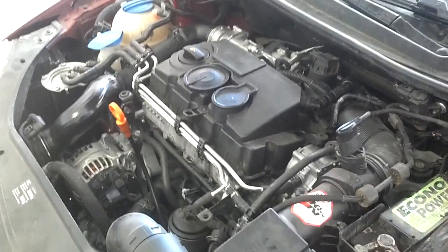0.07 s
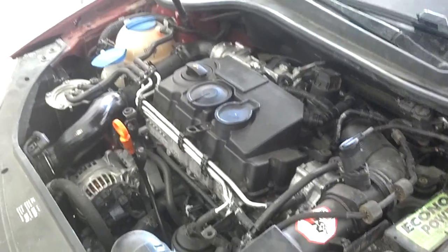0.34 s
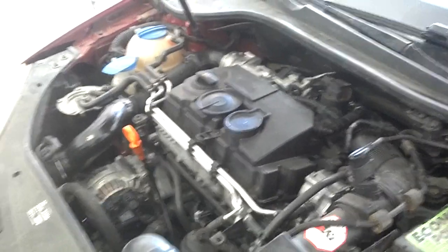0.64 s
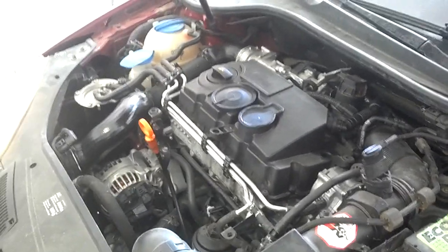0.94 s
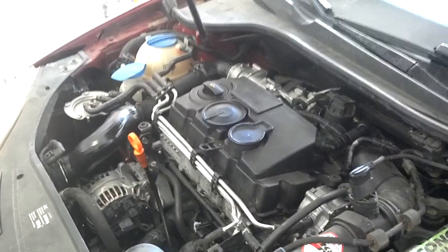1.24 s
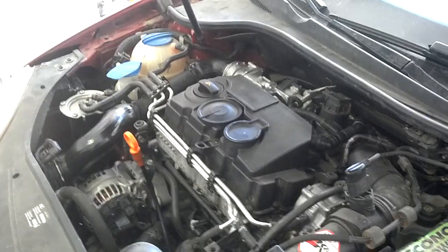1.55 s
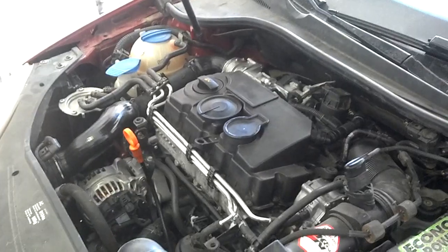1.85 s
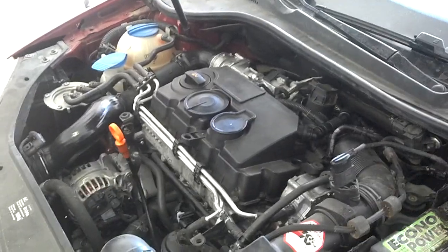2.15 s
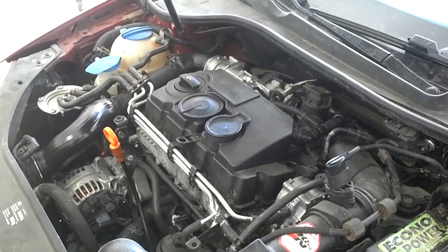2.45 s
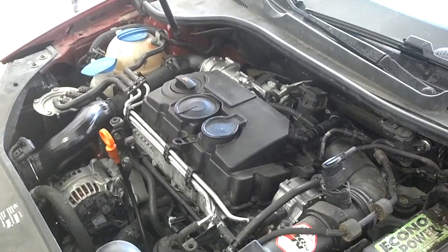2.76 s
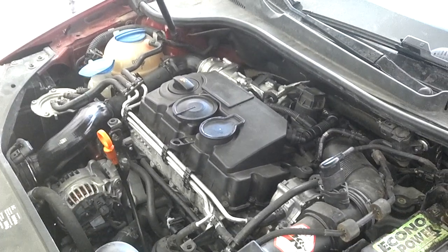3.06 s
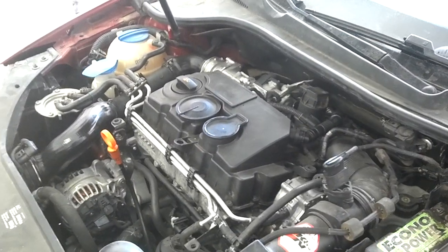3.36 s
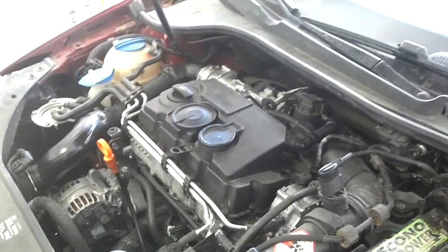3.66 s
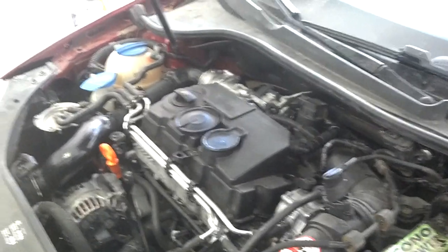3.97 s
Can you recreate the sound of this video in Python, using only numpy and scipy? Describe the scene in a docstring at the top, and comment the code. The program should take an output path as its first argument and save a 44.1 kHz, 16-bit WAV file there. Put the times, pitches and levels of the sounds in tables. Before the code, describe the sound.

A diesel car engine idles close up with a rapid, regular metallic clatter.

```python
"""A four-cylinder diesel idles in an open engine bay, heard from close by.
Each firing is a knock that rings the block and an injector tick; the casing thuds, a valve taps,
and once a cycle something loose rattles, over the whirr of belts and gears.
Two close microphone ports, widened by cross-subtraction, pick it up."""
import sys
import numpy as np
from scipy import signal
from scipy.fft import rfft, irfft
from scipy.io import wavfile

SR = 44100
rng = np.random.default_rng(int(sys.argv[2]) if len(sys.argv) > 2 else 0)


def inscribe(sig):
    """Save sig as 16-bit PCM at rate SR to the path in sys.argv[1].

    A 1-D sig is mono; a 2-D sig holds one channel per row.
    Samples are clipped to [-1, 1] before scaling.
    """
    pcm = np.round(np.clip(np.atleast_2d(sig).T, -1, 1) * 32767)
    wavfile.write(sys.argv[1], SR, pcm.astype(np.int16))


N = 176400
TIME_S = np.arange(N) / SR
NEAR_ONLY = np.array([[1], [0]])
DETUNE, BLOW_SCATTER_DB = 0.0082, 0.96
TICK_RISE_S, TICK_HOLD_S, TICK_REPEAT = 0.0012, 0.0017, 0.54


def undb(db):
    """Decibels to gain."""
    return 10 ** (np.asarray(db) / 20)


def curve(points):
    """Straight lines through (s, value) points."""
    return np.interp(TIME_S, *np.array(points, float).T)


def response(points):
    """Gain at every frequency from (Hz, dB) points."""
    hz, db = np.array(points, float).T
    return undb(np.interp(np.log(np.fft.rfftfreq(N, 1 / SR) + 1), np.log(hz), db))


def colour(x, points):
    """Shape a sound by a spectrum."""
    return irfft(rfft(x) * response(points), N)


def crank_times(crank, degrees):
    """Times in seconds at which the 720-degree cycle passes a crank angle."""
    passes = np.arange(int(crank[-1]) + 1) + degrees / 720
    return np.interp(passes, crank, TIME_S, right=2 * N / SR)


def cyclic_noise(crank, repeat):
    """Noise at two ports; the share `repeat` of its power recurs every cycle."""
    size = int(N / crank[-1]) // 2 * 2
    loop = irfft(np.exp(2j * np.pi * rng.random((2, size // 2 + 1)))) * np.sqrt(size)
    locked = loop[:, (crank % 1 * size).astype(int)]
    return np.sqrt(repeat) * locked + np.sqrt(1 - repeat) * rng.standard_normal((2, N))


def blows(crank, degrees, db, rise_s, decay_s, hold_s=0):
    """Envelope of one blow a cycle: quick rise, hold, exponential decay, uneven strength."""
    times = crank_times(crank, degrees)
    current = np.searchsorted(times[1:] - 0.01, TIME_S)  # 10 ms lead for the rise
    age_s = TIME_S - times[current]
    strength = undb(db + BLOW_SCATTER_DB * rng.standard_normal(len(times)))
    return strength[current] * np.exp(np.minimum(age_s, 0) / rise_s - np.maximum(age_s - hold_s, 0) / decay_s)


def add_mode(out, start_s, hz, db, swell_s, phases):
    """Add a resonance that swells and dies away; one phase in turns per port."""
    first = int(max(start_s, 0) * SR)
    t = np.arange(first, min(first + int(10 * swell_s * SR), N)) / SR - start_s
    age = np.maximum(t, 0) / swell_s
    envelope = undb(db) * (age * np.exp(1 - age)) ** 2
    out[:, first:first + len(t)] += envelope * np.sin(2 * np.pi * (hz * t + phases[:, None]))


def ringing_parts(crank, table, scatter_db):
    """Parts ring once a cycle, each at its own crank angle, at the near port."""
    out = np.zeros((1, N))
    for degrees, hz, db, swell_s in table:
        phase = rng.random(1)
        for start_s in crank_times(crank, degrees):
            force, detune = rng.standard_normal(2)
            add_mode(out, start_s, hz * (1 + DETUNE * detune), db + scatter_db * force, swell_s, phase)
    return out * NEAR_ONLY


# Each row: centre in seconds, level in dB, half length in seconds.
MURMURS = [(0.256, -3.5, 0.023), (0.315, -3, 0.059), (1.43, -4.5, 0.033), (2.84, -4.5, 0.024)]
# Each row: frequency in Hz, level in dB.
MURMUR_SPECTRUM = [(150, -22), (260, -15.5), (335, -3), (400, -23.5), (470, -5), (650, -16.5),
                   (1200, -15.5), (3000, -73)]


def murmurs():
    """Brief swells of hollow, low noise."""
    envelope = sum(undb(db) * np.exp(-((TIME_S - at_s) / half_s) ** 2) for at_s, db, half_s in MURMURS)
    return colour(envelope * rng.standard_normal((2, N)), MURMUR_SPECTRUM)


# Each row of both: frequency in Hz, level in dB.
WHIRR_LOW_SPECTRUM = [(20, -48), (45, -28), (75, -22), (100, -56), (135, -21), (190, -21), (220, -20),
                      (280, -19.5), (370, -20.5), (450, -20), (570, -18.5), (750, -21), (1000, -26.5),
                      (2000, -68)]
WHIRR_HIGH_SPECTRUM = [(500, -40.5), (900, -25), (1050, -19.5), (1220, -17), (1400, -20), (1650, -26),
                       (2050, -21.5), (2650, -27), (3000, -25), (3450, -29.5), (4000, -35), (5500, -36.5),
                       (7100, -38), (9000, -42.5), (12000, -50.5), (15000, -45)]


def whirr(crank, low_db, high_db, flutter_db=2.5, flutter_per_s=250):
    """Belts and gears run on between firings, with a fine flutter in the treble."""
    count = int(flutter_per_s * N / SR)
    wander = np.interp(np.linspace(0, count - 1, N), np.arange(count), rng.standard_normal(N)[:count])
    low = colour(cyclic_noise(crank, repeat=0.47), WHIRR_LOW_SPECTRUM)
    high = colour(undb(flutter_db * wander) * cyclic_noise(crank, repeat=0.39), WHIRR_HIGH_SPECTRUM)
    return low * undb(low_db) + high * undb(high_db)


# Each row: crank angle in degrees, level in dB, decay in seconds.
RATTLE_BLOWS = [(453, -6.5, 0.014), (556, -9, 0.015)]
# Each row: frequency in Hz, level in dB.
RATTLE_SPECTRUM = [(200, -55), (350, -26), (440, -3), (560, -20), (680, -7), (800, -12.5), (1000, -31),
                   (2000, -31)]
# Each row: multiple of the firing rate, level in dB.
HUM_HARMONICS = [(1, -78), (2, -49.5), (3, -59), (5, -44), (9, -48), (10, -45)]
# Each row: crank angle in degrees, frequency in Hz, level in dB, swell in seconds.
CASING_THUDS = [(0, 428, -33.5, 0.0068), (46.1, 296.4, -26.5, .0074), (141.5, 265, -33, 0.01),
                (230.4, 315, -27.5, 0.0056), (408.7, 233, -29, 0.0047), (411, 340, -30, 0.005),
                (428, 578, -26, 0.0037), (431.5, 150.6, -26, 0.0082), (447, 735, -26, 0.003),
                (478, 457, -26.5, 0.006), (491.4, 277.6, -32.5, 0.0068), (563, 751, -23.5, 0.0034),
                (596, 430, -30.5, .0055), (609.6, 145, -36, 0.0089), (630, 597, -29.5, 0.0033)]


def casing(crank, rattle_rise_s=0.0025):
    """The shaking engine hums, its casing thuds and a loose part rattles."""
    shake = sum(blows(crank, degrees, db, rattle_rise_s, decay_s) for degrees, db, decay_s in RATTLE_BLOWS)
    firings = 4 * crank
    hum = sum(undb(db) * np.sin(2 * np.pi * (k * firings + rng.random())) for k, db in HUM_HARMONICS)
    thuds = ringing_parts(crank, CASING_THUDS, scatter_db=1)
    rattle = colour(shake * cyclic_noise(crank, repeat=0.49), RATTLE_SPECTRUM)
    return thuds + hum * NEAR_ONLY + rattle


# Each row: crank angle in degrees, frequency in Hz, level in dB, swell in seconds.
METAL_PINGS = [(2.97, 1830, -23.5, 0.00064), (3, 3580, -27.5, .0009), (14.11, 3396, -23.5, 0.0022),
               (176.8, 7235, -33, 0.0024), (320.4, 3100, -34, .0018), (326, 4600, -35, 0.0016),
               (362, 3488, -27, 0.0034), (545.5, 3640, -26, 0.0016), (543.5, 1450, -24, 0.0011)]


def pings(crank):
    """Injectors and valve ring with short metallic pings."""
    return ringing_parts(crank, METAL_PINGS, BLOW_SCATTER_DB)


# Each row of all three: frequency in Hz, level in dB.
TICK_SPECTRUM = [(700, -39), (1500, -25), (2100, -22), (2650, -15), (3000, -22.5), (3450, -17.5),
                 (4000, -26.5), (4800, -27), (5500, -25.5), (6500, -26.5), (7100, -25), (8000, -29),
                 (9000, -33), (9800, -29.5), (11500, -37.5), (14500, -32.5)]
VALVE_SPECTRUM = [(1000, -58), (2200, -15), (2650, -20), (3200, -16), (3900, -30), (4700, -17), (5500, -28),
                  (9000, -28.5), (12000, -40), (15000, -30)]
SNAP_SPECTRUM = [(3000, -51), (6500, -19), (7200, -7.5), (7700, -11.5), (9000, -51), (15000, -50)]
# Each row: crank angle in degrees, level in dB.
INJECTOR_SNAPS = [(9, -5.5), (184, -1), (547, -12)]
# Each row: a cylinder's tick angle in degrees, tick level in dB, tick decay in seconds,
# knock angle in degrees, base knock swell in seconds.
CYLINDER_FIRINGS = [(5, -0.5, 0.0071, 9.5, .002), (181.4, 1, 0.0058, 184, 0.0039),
                    (365.5, -1.5, 0.0076, 364, 0.0038), (547, 0, 0.0056, 561, 0.0047)]


def injectors_and_valve(crank, tick_db=1.66):
    """Four injectors tick, three snap hard on closing; one valve taps in between."""
    ticks = sum(blows(crank, degrees, tick_db + db, TICK_RISE_S, decay_s, TICK_HOLD_S)
                for degrees, db, decay_s, _, _ in CYLINDER_FIRINGS)
    snaps = sum(blows(crank, degrees, db, TICK_RISE_S / 2, decay_s=0.0023) for degrees, db in INJECTOR_SNAPS)
    taps = blows(crank, degrees=330, db=-1.5, rise_s=TICK_RISE_S, decay_s=0.013, hold_s=TICK_HOLD_S)
    layers = [(ticks, TICK_SPECTRUM), (snaps, SNAP_SPECTRUM), (taps, VALVE_SPECTRUM)]
    return sum(colour(envelope * cyclic_noise(crank, TICK_REPEAT), tone) for envelope, tone in layers)


# Each row: frequency in Hz, factor on the swell time, level in dB for each of cylinders 1 to 4.
BLOCK_MODES = [(812, 1.7, -38, -43, -33, -32.5), (1066.6, 0.87, -23.5, -14.5, -40, -40),
               (1184, 1.3, -34, -51, -31, -52), (1262, 0.88, -17, -47, -51, -52),
               (1351, 0.87, -46, -40, -51, -23.5), (1471, 0.78, -22, -34, -24.5, -26.5),
               (1741, 1.2, -20, -29, -36, -39), (1953, 0.92, -35, -40, -31.5, -33),
               (2091, 1.17, -17.5, -25, -27, -33.5), (3023, 1.58, -26, -24, -35, -31.5)]
KNOCK_DB, KNOCK_FAR_DB = -2, -17.5
KNOCK_SCATTER_DB, MODE_SCATTER_DB, KNOCK_JITTER_S = 0.77, 1.06, 0.00013


def knocks(crank):
    """Each combustion rings the block; every cylinder favours its own modes."""
    out = np.zeros((2, N))
    for cylinder, (_, _, _, degrees, swell_s) in enumerate(CYLINDER_FIRINGS):
        mode_phases = rng.random((len(BLOCK_MODES), 2))
        for due_s in crank_times(crank, degrees):
            late, force = rng.standard_normal(2)
            start_s = due_s + KNOCK_JITTER_S * late
            for (hz, stretch, *levels_db), phases in zip(BLOCK_MODES, mode_phases):
                detune, scatter = rng.standard_normal(2)
                db = KNOCK_DB + levels_db[cylinder] + KNOCK_SCATTER_DB * force + MODE_SCATTER_DB * scatter
                add_mode(out, start_s, hz * (1 + DETUNE * detune), db, swell_s * stretch, phases)
    return out * undb([[0], [KNOCK_FAR_DB]])


# Each row: time in seconds, engine speed in rpm.
SPEED_RPM = [(0.0, 791.08), (0.2, 789.27), (0.42, 819.67), (0.8, 819.86), (1.1, 823.79), (1.8, 828.0),
             (2.6, 826.35), (3.3, 829.24), (4.0, 831.28)]
# Each row of both: time in seconds, level in dB.
FIRING_DB = [(0, -25.5), (.08, -3.5), (.17, -5), (.32, -2), (.48, -1), (.85, 0.5), (1.3, -0.5),
             (2.1, -0.25), (3.4, -0.7), (4, -1)]
BODY_DB = [(0, 0), (.2, -5), (.45, 0), (2, -0.5), (4, -.5)]


def scene():
    """The engine's parts follow the crankshaft, over a few murmurs."""
    crank = np.cumsum(curve(SPEED_RPM)) / (120 * SR)  # cycles of two turns
    firing_db, body_db = curve(FIRING_DB), curve(BODY_DB)
    firings = (knocks(crank) + injectors_and_valve(crank) + pings(crank)) * undb(firing_db)
    body = casing(crank) * undb(body_db)
    return firings + body + whirr(crank, low_db=body_db, high_db=0.13 * firing_db) + murmurs()


# Each row of both: frequency in Hz, gain in dB.
FAR_PORT_EQ = [(200, -4), (1000, -6), (7500, -7), (9500, -1)]
MID_BASS_LIFT = [(30, 22), (60, 11.5), (125, 14.5), (250, 19.5), (500, 9), (1000, 4), (1500, -0.5),
                 (2000, -0.5)]
PORT_LAG_S, LOWPASS_HZ = 16 / SR, 15800


def record(dry):
    """Each port has the delayed other one subtracted; the bass is restored and the top cut."""
    far_gain = response(FAR_PORT_EQ)
    near, far = rfft(dry[0]), rfft(dry[1]) * far_gain
    delay = np.exp(-2j * np.pi * np.fft.rfftfreq(N, 1 / SR) * PORT_LAG_S)
    mid_gain, side_gain = (1 - delay) * response(MID_BASS_LIFT), 1 + delay
    norm = np.sqrt((abs(mid_gain) ** 2 + abs(side_gain) ** 2) * (1 + far_gain ** 2))
    mid = irfft((near + far) * mid_gain / norm, N)
    side = irfft((near - far) * side_gain / norm, N)
    lowpass = signal.ellip(10, .2, 70, LOWPASS_HZ, fs=SR, output="sos")
    return signal.sosfilt(lowpass, np.array([mid + side, mid - side]))


dry = scene()
out = record(dry)
inscribe(out)
```